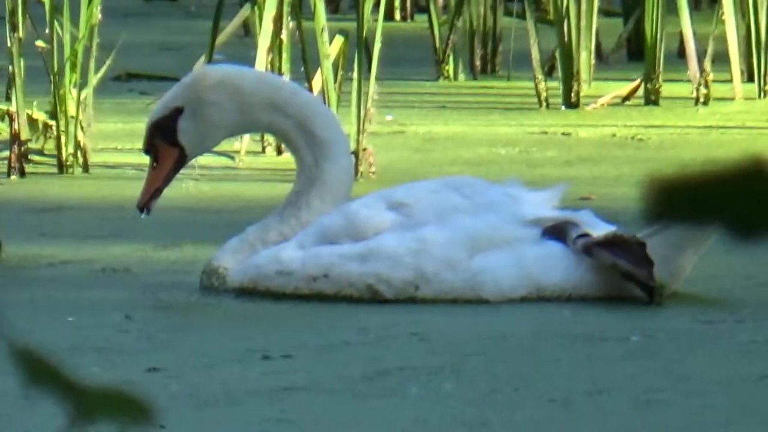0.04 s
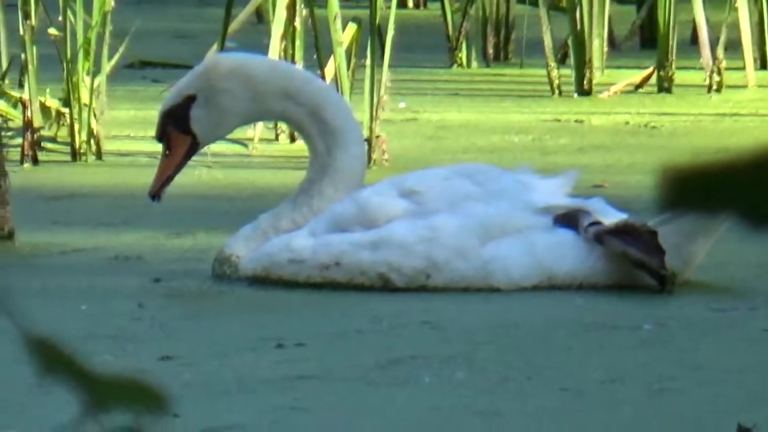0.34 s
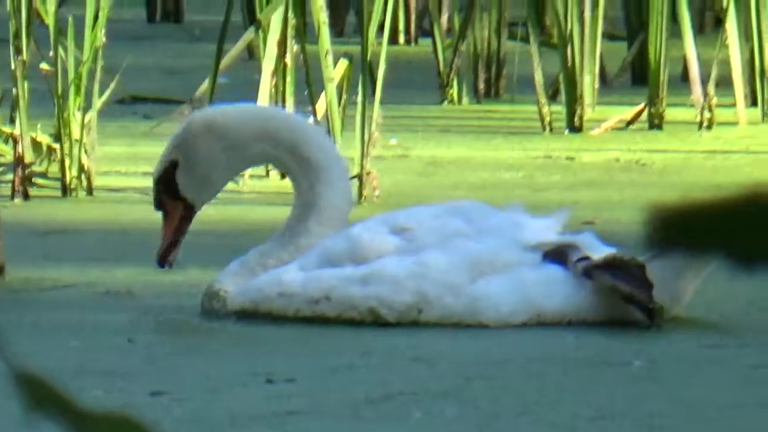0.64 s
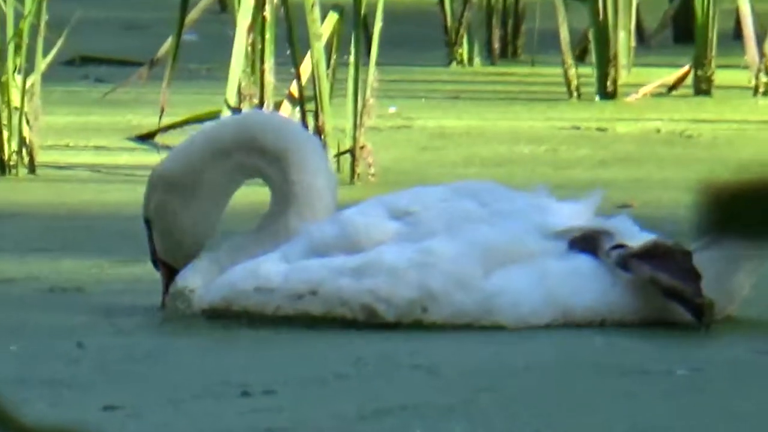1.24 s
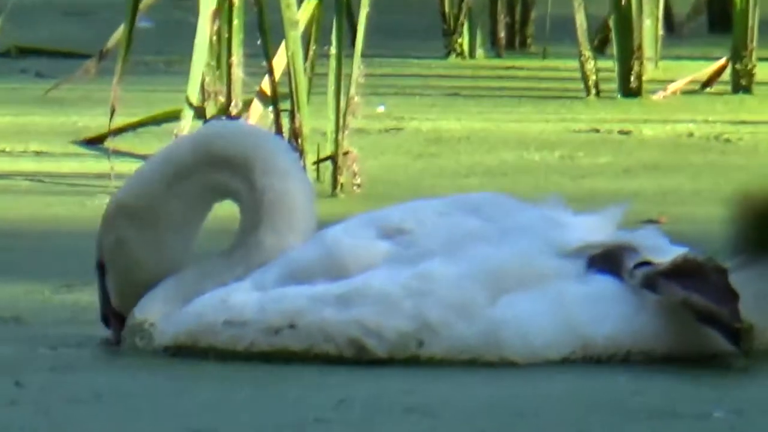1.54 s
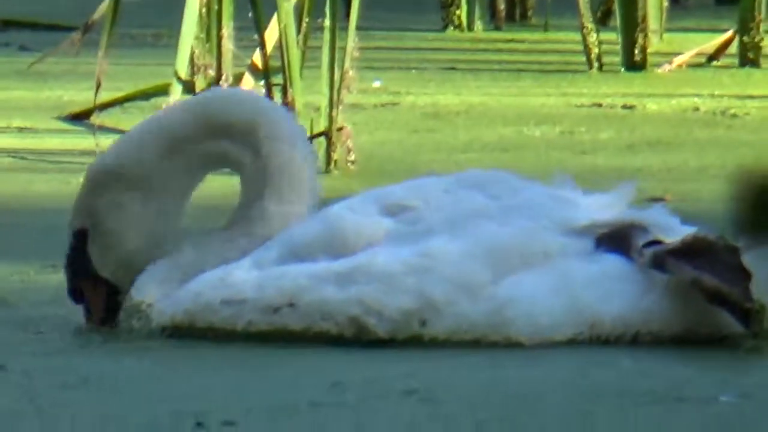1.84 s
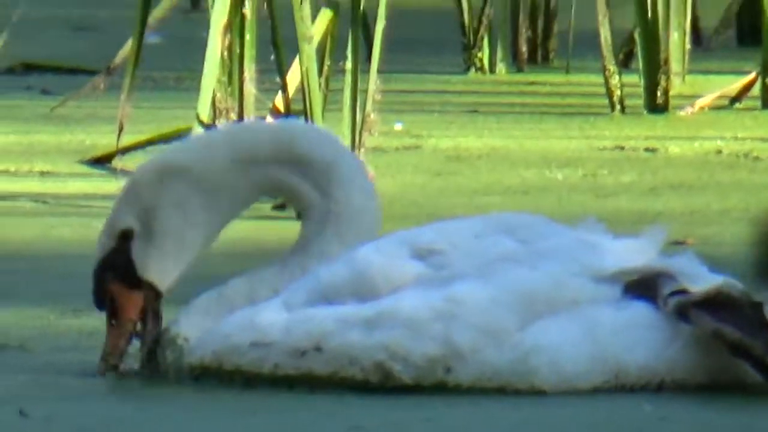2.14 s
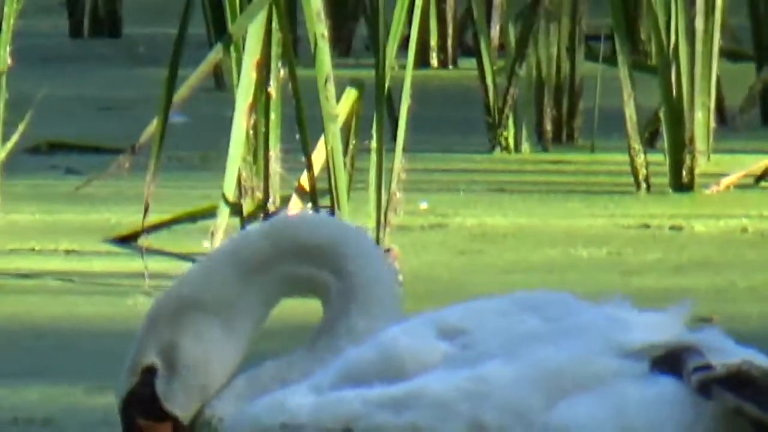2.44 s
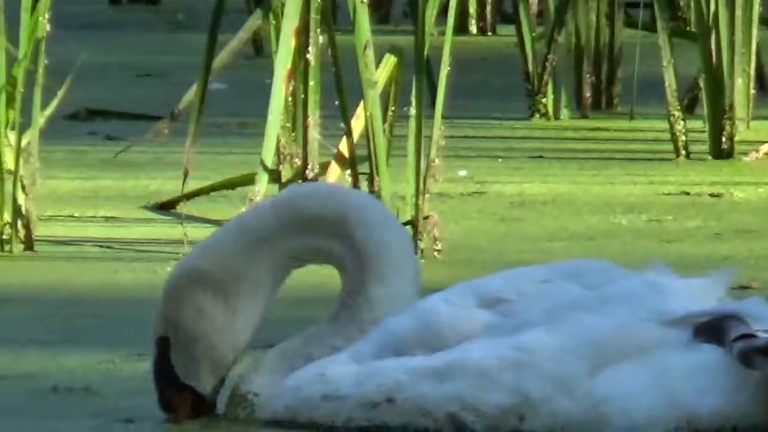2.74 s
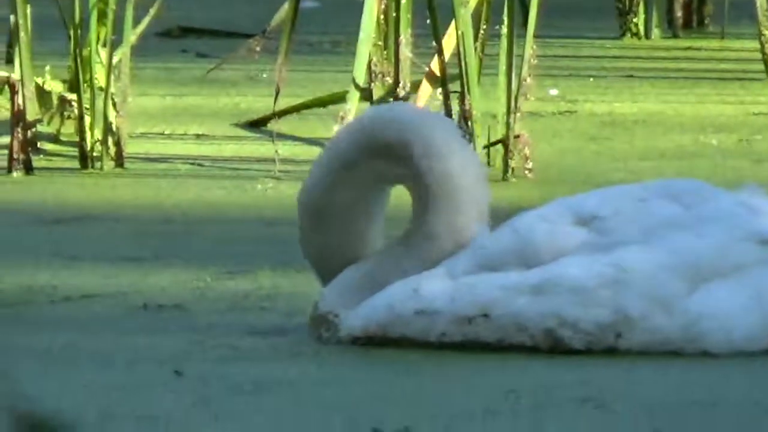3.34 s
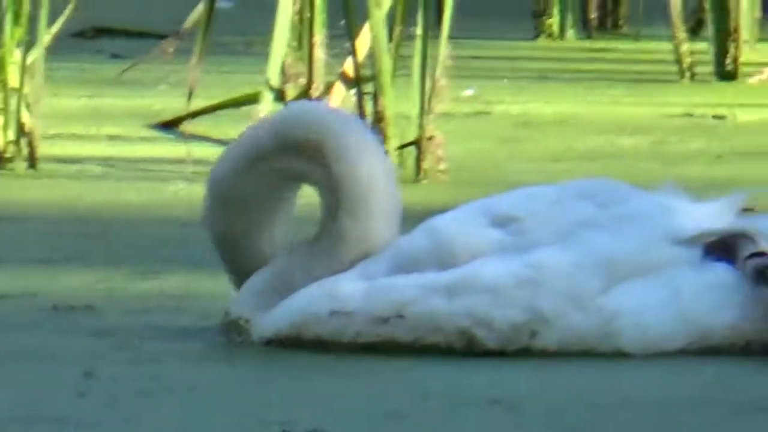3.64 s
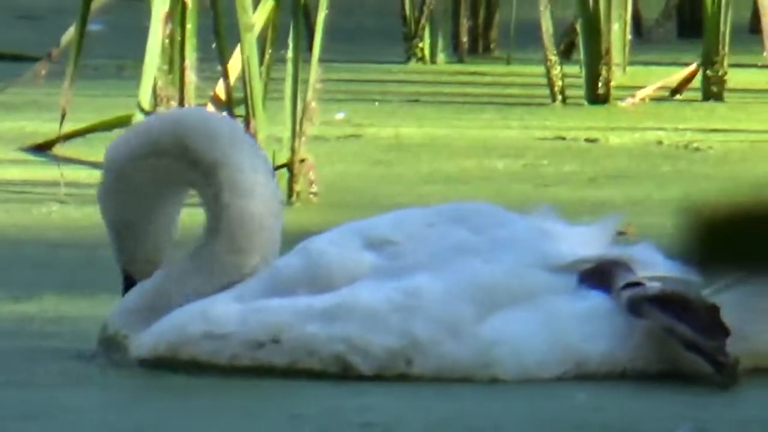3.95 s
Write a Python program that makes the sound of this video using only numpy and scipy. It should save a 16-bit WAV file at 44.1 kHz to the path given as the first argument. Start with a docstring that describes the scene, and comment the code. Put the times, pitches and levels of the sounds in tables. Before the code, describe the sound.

A bird gives two thin, high whistles of a few slurred notes, at about 0.2 and 2.3 seconds, echoing among trees. Distant wind, low rumble and traffic continue throughout; a far motor hum drops after 2 seconds and fades by 3.3. Small birds chirp faintly, mostly between 2 and 3 seconds. A hand-held camera ticks lightly, clicking sharply near 1.7 and 3.9 seconds.

```python
"""Wind rushes in the distance over a low rumble, with a far road and one droning motor behind it.
Among the trees by a marsh pond, a bird gives two thin whistles of a few slurred notes that ring on
in the wood. Small birds chirp far off, and there are soft crackly rustles, as of a bill dabbling.
A hand-held camera ticks lightly under the fingers and gives two sharp clicks that ring its casing."""
import sys
import numpy as np
from scipy import signal
from scipy.fft import rfft
from scipy.io import wavfile
from scipy.ndimage import uniform_filter1d

SR = 44100
rng = np.random.default_rng(int(sys.argv[2]) if len(sys.argv) > 2 else 0)


def store_wav(level_fs):
    """Save 16-bit WAV to argv[1]."""
    pcm = np.round(np.clip(np.atleast_2d(level_fs), -1, 1) * 32767)
    wavfile.write(sys.argv[1], SR, pcm.T.astype(np.int16))


N = 176400

# tone colour of the wind, the rumble and the road (frequency [Hz], relative level [dB])
WIND_SPECTRUM = [(120, -40), (330, -10), (480, -5), (700, -.5), (1000, 0), (1300, -5.5), (1750, -11),
                 (2200, -17), (3200, -23), (4300, -27), (7000, -31.5), (11000, -39.5)]
RUMBLE_SPECTRUM = [(20, -22), (35, -21), (58, 1), (95, 0), (150, -8.5), (250, -14.5), (500, -41.5)]
ROAD_SPECTRUM = [(40, -28), (105, -5), (170, 0.5), (255, -1), (330, -8.5), (420, -11.5), (700, -39)]
# how the wind and the road swell and sink (time [s], relative level [dB])
WIND_LEVEL = [(0, -46), (.8, -46), (1.15, -48), (1.5, -46.5), (2.1, -47), (3.3, -48), (4, -47.5)]
ROAD_LEVEL = [(0, -48.5), (.38, -45), (.7, -50.5), (1.2, -50), (1.75, -45.5), (2.2, -52), (2.6, -48),
              (3.05, -51), (3.28, -54), (3.55, -51), (4, -47.5)]
# how alike the background noise is in both ears (frequency [Hz], likeness [0 to 1])
EAR_LIKENESS = [(130, 0.99), (270, .96), (560, 0.85), (1170, 0.75), (2500, 0.46), (5200, 0.49),
                (10000, 0.87)]
# how far that noise leans to one side (frequency [Hz], left minus right [dB])
SIDE_LEAN = [(300, 0), (810, 1.9), (1900, 2.5), (4600, -0.5), (10000, 0)]
# the far motor's hum (time [s], pitch [Hz], level [dB])
MOTOR_HUM = [(0, 143.2, -53), (.3, 145.1, -43), (.6, 147.4, -51), (.85, 146, -53), (1.1, 148.5, -42.5),
             (1.4, 150.9, -45), (1.75, 152, -46), (2.08, 153, -54.5), (2.18, 150, -61),
             (2.32, 137.9, -49.5), (2.55, 108.8, -49.5), (3.0, 108, -50.5), (3.3, 107.7, -64)]
# how long the wood echoes (frequency [Hz], time to fade by 60 dB [s])
ECHO_FADE = [(500, .8), (3000, 0.66), (5000, 1.0), (10000, 0.73)]
# soft rustles (start [s], length [s], level [dB], low edge [Hz], high edge [Hz])
SOFT_RUSTLES = [(1.472, .06, -65.5, 3800, 9000), (1.521, 0.058, -68, 8000, 11000),
                (3.108, 0.08, -68, 5000, 6070), (3.11, 0.065, -70, 7000, 10000)]
# far birds (start [s], length [s], first pitch [Hz], last pitch [Hz], relative level [dB])
FAR_CHIRPS = [(0.285, .04, 5850, 6250, -59), (0.313, .06, 6200, 6160, -62), (1.181, .07, 7790, 8000, -68),
              (1.94, 0.09, 3000, 2740, -62), (1.948, .08, 7650, 7450, -67), (2.092, 0.053, 4150, 3620, -65),
              (2.235, 0.048, 2644, 2850, -56), (2.37, 0.044, 3580, 3410, -56),
              (2.372, 0.083, 6420, 6110, -61.5), (2.383, 0.031, 2250, 2180, -52),
              (2.512, .09, 3240, 2770, -57.5), (2.66, 0.048, 2890, 2750, -54.5),
              (2.743, 0.058, 3066, 3310, -55.5), (2.876, 0.031, 5850, 5440, -64),
              (2.895, .06, 5390, 5420, -64)]
# fingers on the camera (time [s], level before filtering [dB], low edge [Hz], high edge [Hz])
FINGER_TICKS = [(.777, -45, 2880, 6000), (1.305, -52, 7000, 10500), (1.545, -48, 8000, 10500),
                (1.66, -36, 2902, 3700), (2.072, -52.5, 5000, 10000), (2.185, -47, 8000, 10000),
                (2.279, -46, 7040, 10500), (2.3935, -35, 5470, 9800), (2.544, -32.5, 8100, 10000),
                (2.6595, -43, 7000, 9700), (3.331, -42, 3800, 5000), (3.609, -43, 2000, 4500),
                (3.727, -43.5, 1800, 10000), (3.8545, -35, 2290, 10000), (3.871, -44.5, 4990, 10000)]
# the small knocks that make up the two clicks (time [s], relative level [dB])
CLICK_KNOCKS = [(1.7358, -38), (1.7372, -27.5), (1.7382, -28), (1.7412, -39), (3.8548, -46),
                (3.8562, -39.5)]
# tones the casing rings with (frequency [Hz], relative level [dB], time to fade by 60 dB [s])
CASING_TONES = [(110, -20, .05), (626, -8, 0.041), (1240, -15, .02), (2220, -7, 0.012), (3050, -9.5, 0.016),
                (3620, -20, 0.016), (4380, -8, 0.013), (4930, -8, 0.01), (5510, -4.5, 0.0076),
                (7670, -15, .005), (8170, -10, 0.0051), (9400, -9, 0.003), (10400, -13, 0.0036)]
# the main bird's notes (start [s], length [s], settled pitch [Hz], drop on to that pitch [Hz],
# relative level [dB], octave compared with the note [dB], rasp [share of pitch])
WHISTLE_NOTES = [(.184, 0.13, 4892, 233, -44, -15.5, .024), (.312, 0.12, 4790, 71, -42, -17.5, .016),
                 (2.26, .062, 4770, 340, -43.5, -18, .006), (2.34, .045, 4870, 60, -52, -12, .012),
                 (2.374, .06, 4788, 90, -43, -14, .014), (2.437, 0.1234, 4790, 89, -47.5, -16, .022)]


def gain_of(db):
    """Turns decibels into a number to multiply by."""
    return 10 ** (np.asarray(db) / 20)


def evened(x):
    """Scales a signal to an average strength (rms) of 1."""
    return x / np.sqrt(np.mean(x ** 2) + 1e-20)


def look_up(points, hz):
    """Reads between a table's rows, on a scale where every octave is equally wide."""
    f, value = np.transpose(points)
    return np.interp(np.log(hz + 1), np.log(f + 1), value)


def follow(points):
    """Turns each column of a time table into one value per sample."""
    times, *columns = np.transpose(points)
    return [np.interp(np.arange(N) / SR, times, column) for column in columns]


def add(mix, start, sound):
    """Mixes a sound in at a start time in seconds."""
    part = mix[..., round(start * SR):][..., :sound.shape[-1]]
    part += sound[..., :part.shape[-1]]


def wander(t, top_hz):
    """A smooth random wobble: twenty sine waves, none faster than top_hz."""
    rates = np.geomspace(top_hz / 10, top_hz, 20)
    return sum(np.sin(2 * np.pi * (f * t + rng.random())) for f in rates) / np.sqrt(10)


def band(x, low_hz, high_hz):
    """Gently turns down everything outside two frequencies."""
    return signal.sosfilt(signal.butter(2, [low_hz, high_hz], "band", fs=SR, output="sos"), x)


def noise(spectrum, patchy_db):
    """Stereo noise of a given tone colour, with drifting louder and softer patches."""
    frames, hz = N // 512 + 5, np.fft.rfftfreq(2048, 1 / SR)
    a, b, c, d, patches = rng.standard_normal((frames, len(hz), 5)).T
    patches = uniform_filter1d(patches, size=20, axis=0)  # smooth across frequency
    patches = evened(uniform_filter1d(patches, size=8, axis=1))  # then across time
    likeness = look_up(EAR_LIKENESS, hz)[:, None]
    left = a + 1j * b
    right = likeness * left + np.sqrt(1 - likeness ** 2) * (c + 1j * d)
    lean = gain_of(look_up(SIDE_LEAN, hz) / 2)[:, None]
    bands = np.array([left * lean, right / lean])
    bands *= gain_of(look_up(spectrum, hz)[:, None] + patchy_db * patches)
    return evened(signal.istft(bands, nperseg=2048, noverlap=1536)[1][:, :N])


def wood_echo(x, likeness=0.48, early_db=0.5, early_s=0.015):
    """Sound bounces off reeds and trunks: many small echoes, each band fading at its own speed."""
    echoes = np.zeros((2, SR))
    slots = np.arange(300, SR - 20, 20)  # one echo in every 20 samples
    arrivals = slots + rng.integers(0, 20, (2, len(slots)))
    np.put_along_axis(echoes, arrivals, rng.choice([-1., 1.], arrivals.shape), 1)
    echoes[1] = likeness * echoes[0] + np.sqrt(1 - likeness ** 2) * echoes[1]  # ears partly alike
    hz, t, bands = signal.stft(echoes, SR, nperseg=256)
    fade = gain_of(early_db * np.exp(-t / early_s) - 60 * t / look_up(ECHO_FADE, hz)[:, None])
    tail = signal.istft(bands * fade, SR, nperseg=256)[1]
    treble = abs(rfft(tail))[:, len(tail[0]) // 20:len(tail[0]) // 5]
    tail /= np.sqrt(np.mean(treble ** 2))  # on average, the treble keeps its strength
    return signal.fftconvolve(x[None], tail, axes=1)[:, :N]


def wind(lift_db=1, rumble_db=-48):
    """Far wind makes a nearly steady rush over a deep rumble."""
    rush = noise(WIND_SPECTRUM, patchy_db=0.88) * gain_of(lift_db + follow(WIND_LEVEL)[0])
    return rush + gain_of(rumble_db) * noise(RUMBLE_SPECTRUM, patchy_db=0.74)


def road():
    """The dull roar of far traffic swells and sinks."""
    return noise(ROAD_SPECTRUM, patchy_db=1.5) * gain_of(follow(ROAD_LEVEL)[0])


def motor():
    """Only the hum of a far engine's firing carries this far; it wavers, then winds down."""
    hz, db = follow(MOTOR_HUM)
    t = np.arange(N) / SR
    pitch = hz * (1 + 0.0064 * wander(t, top_hz=11))
    phase = 2 * np.pi * np.cumsum(pitch) / SR
    return np.sqrt(2) * gain_of(db + 1.1 * wander(t, top_hz=15)) * np.sin(phase)


def rustles(grains_per_s=1500, echo_db=-6):
    """Soft, brief crackly rustles, as of a bill dabbling."""
    direct = np.zeros(N)
    for start, length, db, low_hz, high_hz in SOFT_RUSTLES:
        t = np.arange(0, length, 1 / SR)
        grains = rng.standard_normal(len(t)) * (rng.random(len(t)) < grains_per_s / SR)
        swell = np.sin(np.pi * np.sqrt(t / length))
        add(direct, start, gain_of(db) * evened(band(grains * swell, low_hz, high_hz)))
    return direct + gain_of(echo_db) * wood_echo(direct)


def far_chirps(waver=0.023, direct_db=-6, echo_db=-2):
    """Small birds sing short, wavering slides, so far off that we hear mostly echo."""
    direct = np.zeros(N)
    for start, length, first_hz, last_hz, db in FAR_CHIRPS:
        t = np.arange(0, length, 1 / SR)
        slide = first_hz + (last_hz - first_hz) * t / length
        pitch = slide * (1 + waver * wander(t, top_hz=246))
        phase = 2 * np.pi * np.cumsum(pitch) / SR
        swell = np.sqrt(abs(np.sin(np.pi * t / length)))
        add(direct, start, np.sqrt(2) * gain_of(db) * swell * np.sin(phase))
    return gain_of(direct_db) * direct + gain_of(echo_db) * wood_echo(direct)


def camera_ticks(snap_s=0.00059, tail_s=0.0067, tail_db=-12, stereo_spread=0.68):
    """The casing gives tiny bright snaps under the fingers, each a burst of noise."""
    out, t = np.zeros((2, N)), np.arange(0, .03, 1 / SR)
    fade = np.exp(-t / snap_s) + gain_of(tail_db) * np.exp(-t / tail_s)
    for start, db, low_hz, high_hz in FINGER_TICKS:
        hiss = rng.standard_normal(len(t)) + stereo_spread * rng.standard_normal((2, len(t)))
        add(out, start, gain_of(db) * band(fade * hiss, low_hz, high_hz))
    return out


def camera_clicks():
    """Each click is a few quick knocks that ring the casing, a little differently left and right."""
    out, t = np.zeros((2, N)), np.arange(0, .08, 1 / SR)
    for start, knock_db in CLICK_KNOCKS:
        for hz, tone_db, fade_s in CASING_TONES:
            phase = 2 * np.pi * rng.random() + min(hz / 3000, 1) * 0.59 * rng.standard_normal((2, 1))
            fade = gain_of(knock_db + tone_db - 60 * t / fade_s)
            add(out, start, fade * np.sin(2 * np.pi * hz * t + phase))
    return out


def bird_whistles(direct_db=-3.5, echo_db=-1.5):
    """Each note is an almost pure tone with a weak octave; it starts raspy and drops on to its pitch."""
    settle_s, rasp_s, rise_s, release_s = 0.0161, 0.03, 0.025, 0.042
    direct = np.zeros(N)
    for start, length, hz, drop_hz, db, octave_db, rasp in WHISTLE_NOTES:
        t = np.arange(0, length, 1 / SR)
        slide = hz + drop_hz * np.exp(-t / settle_s)
        waver = 0.00824 + rasp * np.exp(-t / rasp_s)  # the rasp is a brief extra wobble in pitch
        pitch = slide * (1 + waver * abs(wander(t, top_hz=90.5)))
        phase = 2 * np.pi * np.cumsum(pitch) / SR
        tone = np.sin(phase) + gain_of(octave_db) * np.sin(2 * phase)
        swell = np.minimum(t / rise_s, 1) * np.minimum((length - t) / release_s, 1)
        add(direct, start, np.sqrt(2) * gain_of(db) * swell * tone)
    to_right = np.array([[-0.5], [0.5]])  # the bird is 6 dB louder on the right, its echo 1 dB
    echo = gain_of(echo_db + to_right) * wood_echo(direct)
    return gain_of(direct_db + 6 * to_right) * direct + echo


def scene():
    """Adds up the background, the birds and the camera."""
    background = wind() + road() + motor() + rustles()
    return background + far_chirps() + camera_ticks() + camera_clicks() + bird_whistles()


def record(dry):
    """Cuts away the highest treble, above 11150 Hz."""
    low_pass = signal.firwin(511, 11150, window=("kaiser", 9), fs=SR)
    return signal.oaconvolve(dry, low_pass[None], "same")


dry = scene()
out = record(dry)
store_wav(out)
```